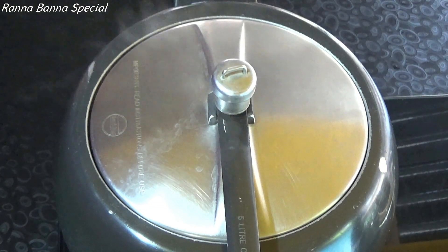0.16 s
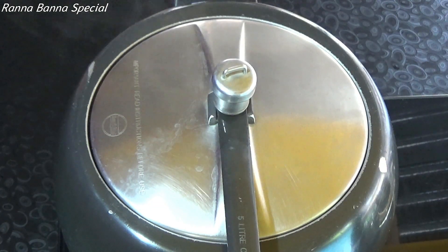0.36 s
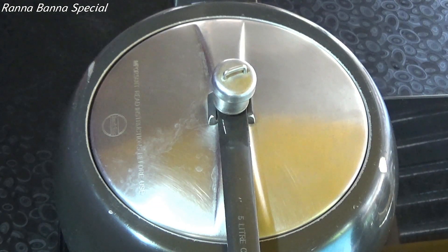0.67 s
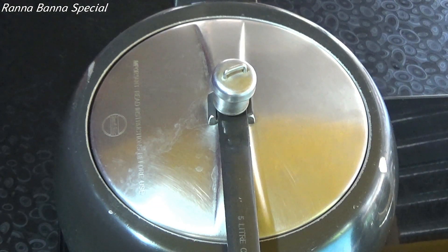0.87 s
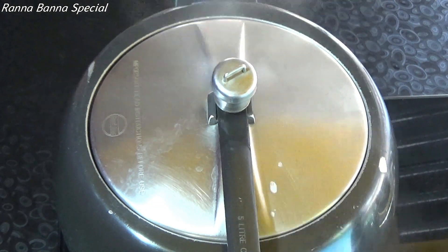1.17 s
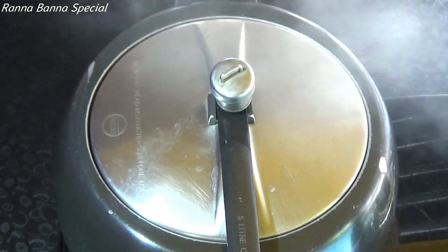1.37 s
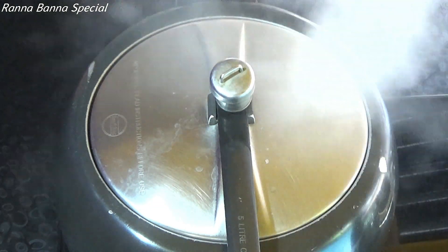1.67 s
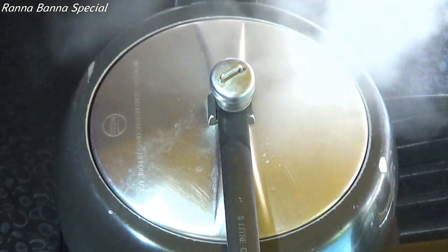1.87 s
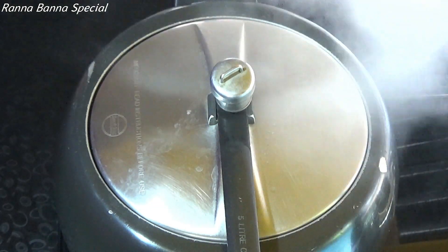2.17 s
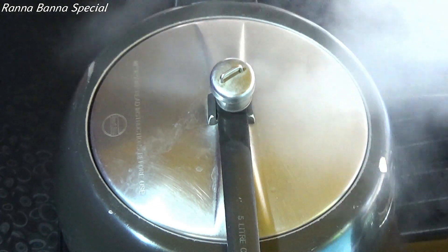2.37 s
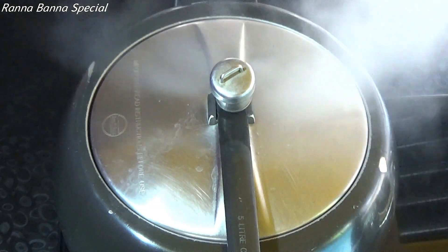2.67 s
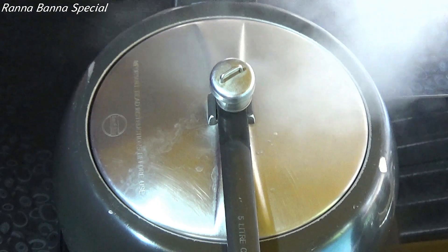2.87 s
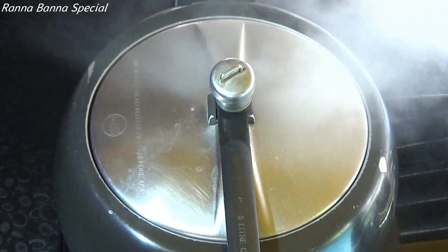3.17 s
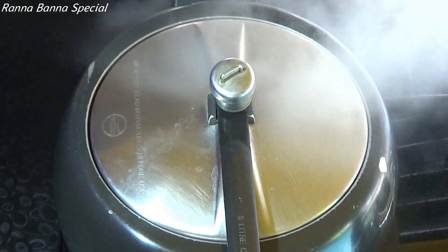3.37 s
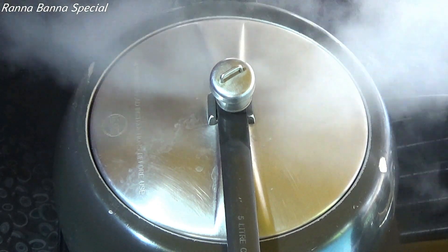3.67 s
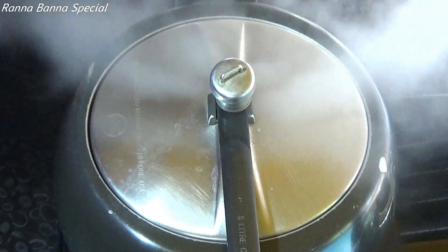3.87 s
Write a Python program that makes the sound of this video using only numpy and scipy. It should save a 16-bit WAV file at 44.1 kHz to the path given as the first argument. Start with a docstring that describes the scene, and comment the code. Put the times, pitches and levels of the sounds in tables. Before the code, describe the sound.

Close up in a small kitchen, steam spits in short soft-edged bursts from a cooker lid, while low muffled knocks flutter faintly on the pot. Just after one second the bursts merge into a strong, bright, continuous hiss, slightly rough and nearly constant to the end. Short tight reflections surround it, the image is mostly central, and a faint burner floor lies beneath.

```python
"""A pressure cooker on a burner in a small kitchen, over a soft steady hush of shaped noise.
First the weight rocks on its vent: steam, made of noise in bands, escapes in quick puffs,
while faint uneven knocks on the pipe ring the pot, made of decaying tones.
Then the weight lifts, the knocking stops and the steam surges into a steady jet.
Short echoes from lid, stove and walls surround the steam and the knocks."""
import sys
import numpy as np
from scipy import signal
from scipy.fft import rfft, irfft
from scipy.io import wavfile
from scipy.ndimage import uniform_filter1d

SR = 44100
rng = np.random.default_rng(int(sys.argv[2]) if len(sys.argv) > 2 else 0)


def boost_factor(decibels):
    """Convert a level in decibels to a linear amplitude factor."""
    exponent = np.asarray(decibels, float) / 20
    return 10 ** exponent


def log_audio(samples):
    """Write samples as a 16-bit WAV file to the path given in sys.argv[1]."""
    # one column per channel
    frames = np.atleast_2d(samples).T
    # limit to full scale, then quantise
    limited = np.clip(frames, -1, 1)
    pcm = np.round(limited * 32767).astype(np.int16)
    wavfile.write(sys.argv[1], SR, pcm)


N = 176576   # length in samples, about 4 s
HZ = np.fft.rfftfreq(N, 1 / SR) + 1e-3   # just above zero, so that logarithms work


def rms_one(x):
    """Scale a sound to an rms (average strength) of 1."""
    return x / np.sqrt(np.mean(x ** 2) + 1e-20)


def ramp(start_s, end_s):
    """A straight rise from 0 to 1 between two times, held before and after."""
    return np.interp(np.arange(N) / SR, [start_s, end_s], [0, 1])


def swell(start_s, top_s, end_s, power):
    """A sine rise from 0 to 1 and a sine fall back, raised to a power."""
    position = np.interp(np.arange(N) / SR, [start_s, top_s, end_s], [0, 1, 0])
    return np.sin(np.pi / 2 * position) ** power


def at_hz(points, hz):
    """Read the second column of a table at any frequency, on a log-frequency axis."""
    table = np.array(points)
    return np.interp(np.log(hz), np.log(table[:, 0]), table[:, 1])


def drift(rate_hz):
    """Slow random wandering with spread 1: noise smoothed twice by a one-pole low-pass."""
    r = np.exp(-16 * np.pi * rate_hz / SR)   # made at an eighth of the sample rate
    noise = rng.standard_normal(N // 8 + 4002)
    slow = signal.lfilter([1], [1, -2 * r, r * r], noise)[4000:]   # skip the filter's start
    return np.interp(np.arange(N) / 8, np.arange(len(slow)), rms_one(slow))


# How far the sound spreads sideways: (frequency [Hz], side relative to middle [dB])
SIDE_SPREAD = [(60, -26), (110, -20), (200, -13), (380, -7.5), (700, -10), (1290, -11), (2000, -16.5),
               (3000, -13.5), (4400, -16.5), (6000, -21.5), (8100, -12.5), (10500, -17.5), (12500, -29)]
# How the middle leans to one side: (frequency [Hz], left over right [dB])
LEFT_LEAN = [(2000, 0), (4700, .1), (6400, .9), (8200, -.2), (10000, -.9), (12500, 0)]


def wide_noise(colour_db):
    """Spectrum of left and right noise: a shared middle that leans by band, plus an unrelated side."""
    middle, side = rfft(rng.standard_normal((2, N))) * boost_factor(colour_db)
    lean = boost_factor(at_hz(LEFT_LEAN, HZ) / 2)
    side = side * boost_factor(at_hz(SIDE_SPREAD, HZ))
    return np.array([middle * lean + side, middle / lean - side])


# Colour of burner and kitchen: (frequency [Hz], relative level [dB per Hz])
HUSH_COLOUR = [(24, -25), (40, -9), (206, 0), (568, -2.5), (746, -3), (2580, -12), (4560, -34),
               (6620, -13.5), (15000, -23)]


def hush():
    """The burner and the kitchen: a smooth steady floor of coloured noise."""
    level_db = -56.5
    return boost_factor(level_db) * rms_one(irfft(wide_noise(at_hz(HUSH_COLOUR, HZ)), N))


def echoes_nearby(x):
    """Dense fading echoes from lid, stove and walls, mostly alike on both sides."""
    t60_s = 0.1   # time to fade by 60 dB
    t = np.arange(int(.2 * SR)) / SR
    echoes = rng.standard_normal((2, len(t))) * boost_factor(-60 * t / t60_s) * (t > .002)
    left_right = echoes[0] + 0.12 * echoes[1] * [[1], [-1]]
    left_right = left_right / np.sqrt(np.sum(echoes[0] ** 2))
    return signal.fftconvolve(x, left_right, axes=1)[:, :N]


# Bouts of the weight rattling on the pipe, levels before softening:
# (strongest time [s], thud level [dB], ring level [dB])
RATTLE_BOUTS = [(.125, -61, -61), (.195, -58, -67), (.25, -60, -63), (.35, -58, -66), (.48, -59, -66),
                (.71, -58, -62), (.765, -59, -60), (.915, -54, -57), (1.055, -57, -58), (1.115, -57, -60)]


def rattle_gain(column):
    """Bouts share one rise and fall above a faint steady chatter; all add in power."""
    rise_s, fall_s, rest_db = .04, .06, -63.0
    power = boost_factor(rest_db) ** 2
    for bout in RATTLE_BOUTS:
        top_s = bout[0]
        shape = swell(top_s - rise_s, top_s, top_s + fall_s, 0.86)
        power = power + (boost_factor(bout[column]) * shape) ** 2
    return np.sqrt(power)


# Tones at which the pot rings; the first two rows are the thud, the others the ring:
# (frequency [Hz], relative strike level [dB], time to fade by 60 dB [s])
POT_TONES = [(61.6, -9, 0.092), (80.4, 0, 0.043), (42, -12, .05), (120, -4, 0.033), (220, -2.5, .03),
             (325, 6, 0.036), (433, -3, 0.018)]


def knocking():
    """Uneven soft knocks strike the pot, and each of its tones rings and dies away."""
    knocks_per_s = 70
    phase = np.cumsum(knocks_per_s * (1 + .2 * drift(15)) / SR)   # the pace wanders
    at = np.flatnonzero(np.diff(np.floor(phase)))
    knock_db = 1.5 * rng.standard_normal((len(at), 1))
    tone_db = 3.5 * rng.standard_normal((len(at), len(POT_TONES)))   # each knock excites tones unevenly
    size = boost_factor(knock_db + tone_db)
    tones = []
    for k, (hz, level_db, t60_s) in enumerate(POT_TONES):
        clicks = np.full(N, 1e-18)
        clicks[at] = size[:, k] * boost_factor(level_db)
        r, w = boost_factor(-60 / (t60_s * SR)), 2 * np.pi * hz / SR   # decay and turn per sample
        tones.append(signal.lfilter([0, np.sin(w)], [1, -2 * r * np.cos(w), r * r], clicks))
    thud = rms_one(sum(tones[:2])) * rattle_gain(column=1)
    ring = rms_one(sum(tones[2:])) * rattle_gain(column=2)
    soft = signal.butter(2, [30, 900], "band", fs=SR, output="sos")   # a soft contact has no sharp edge
    seated = 1 - ramp(1.15, 1.19)   # no contact once the weight floats
    return seated * signal.sosfilt(soft, thud + ring)


# Each rock of the weight lets out a puff:
# (opening time [s], widest time [s], shutting time [s], peak level [dB])
STEAM_PUFFS = [(-.07, -0.023, 0.032, -25), (0.044, 0.089, .2, -26.5), (0.155, 0.266, 0.32, -26),
               (0.323, 0.379, 0.51, -25), (.44, 0.548, 0.66, -25), (0.65, 0.722, 0.838, -21.5),
               (.72, 0.796, 0.89, -23.5), (0.887, 0.95, 1.032, -22.5)]


def flow_db():
    """Level of the steam: seepage past the shut weight, puffs and opening jet add in power."""
    seep_db, jet_db = -44, -18
    puffs = sum((boost_factor(db) * swell(opens, widest, shuts, 1.53)) ** 2
                for opens, widest, shuts, db in STEAM_PUFFS)
    jet = boost_factor(jet_db) * np.sin(np.pi / 2 * ramp(0.94, 1.244))
    return 10 * np.log10(boost_factor(seep_db) ** 2 + puffs + jet ** 2)


# Colour of steam past the seated weight: (frequency [Hz], relative level [dB per Hz])
LEAK_COLOUR = [(290, -47), (500, -28), (687, -23.5), (829, -27), (904, -24), (1140, -22.5), (2180, -17.5),
               (2520, -21.5), (4560, -15.5), (6930, -0.5), (8130, -8), (9950, -6.5), (15800, -22)]
# Colour of the open jet: (frequency [Hz], relative level [dB per Hz])
JET_COLOUR = [(40, -41), (150, -53), (350, -37.5), (700, -33), (1300, -28), (1700, -22.5), (3700, -18.5),
              (4250, -17), (4550, -11.5), (5300, -6), (6200, -1), (7000, -1.5), (8000, -7.5), (9300, -9),
              (11300, -9.5), (13300, -14), (15900, -25.5)]
# Faint whistles of vent and lid: (frequency [Hz], width [Hz], lift [dB])
STEAM_WHISTLES = [(686, 26, 7), (895, 50, 4), (2225, 45, 4), (2845, 60, 4), (3415, 40, 4), (3780, 60, 4),
                  (6200, 70, 3), (7010, 65, 3), (7620, 140, 2), (8135, 45, 4), (8260, 65, 3), (8590, 70, 3),
                  (10150, 45, 3)]


def steam(eddy_db, patchy_db):
    """Turbulent hiss in third-octave bands; eddies shake all together, each also flickers alone."""
    level_db = flow_db()
    lift = ramp(1, 1.29)   # the weight rises from rocking to clear
    surge = swell(0.93, 1.38, 1.5, 1)   # the fresh jet surges, then settles
    airy = 1 - ramp(1.07, 1.67)   # the extra treble of the narrow gap fades
    # 3 dB of extra treble at a flow of -23 dB, following the flow up to 2.5 dB above that
    treble_db = airy * (3.0 + 0.3 * np.minimum(level_db + 23, 2.5))
    # less roar while the weight rocks, more in the surge; it swells less than the hiss
    roar_db = (1 - lift) * -2.5 + surge * 1.5 - 0.27 * (level_db + 20.0)
    shoulder_db = surge * -4.5
    core_db = -2.2 * np.sin(np.pi * lift)   # weakest while the weight is half way up

    whistle_db = sum(db / (1 + (2 * (HZ - hz) / width) ** 2) for hz, width, db in STEAM_WHISTLES)
    noise = wide_noise(at_hz(JET_COLOUR, HZ) + whistle_db)
    eddies = drift(300) + 0.38 * drift(30)
    out = np.zeros((2, N))
    for hz in 20 * 2 ** (np.arange(30) / 3):
        # neighbouring bands cross-fade
        band = np.cos(np.pi * np.clip(3 * np.log2(HZ / hz) / 2, -.5, .5)) ** 2
        # the narrow gap colours the puffs
        leak_db = (1 - lift) * (at_hz(LEAK_COLOUR, hz) - at_hz(JET_COLOUR, hz))
        if hz < 4500:
            swell_db = roar_db
        elif hz < 5600:
            swell_db = shoulder_db
        elif hz < 7500:
            swell_db = core_db
        else:
            swell_db = treble_db * np.clip(np.log2(hz / 7500) / 0.64, 0, 1)
        shake_db = eddy_db * np.clip(hz / 9000, .3, 1.2) * eddies   # stronger in the treble
        flicker_db = patchy_db * drift(4.4)
        out += irfft(noise * band, N) * boost_factor(leak_db + swell_db + shake_db + flicker_db)
    return rms_one(out) * uniform_filter1d(boost_factor(level_db), size=200)


def scene():
    """Steam and knocks with their echoes over the hush."""
    cooker = steam(eddy_db=0.5, patchy_db=0.74) + knocking()
    return cooker + boost_factor(-14.0) * echoes_nearby(cooker) + hush()


def top_cut(x):
    """Nothing passes above the cut-off."""
    return signal.sosfilt(signal.butter(12, 15960, fs=SR, output="sos"), x)


def record(dry):
    """A steep low-pass filter removes the very top of the treble."""
    cutoff_hz = 15770
    low_pass = signal.ellip(14, .5, 50, cutoff_hz, fs=SR, output="sos")
    mix = signal.sosfilt(low_pass, dry)
    return top_cut(mix)


dry = scene()
out = record(dry)
log_audio(out)
```